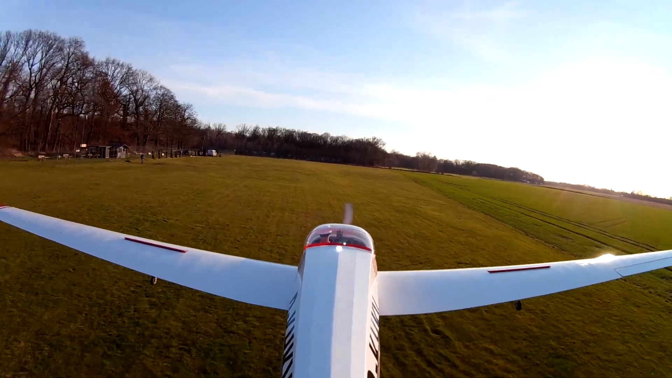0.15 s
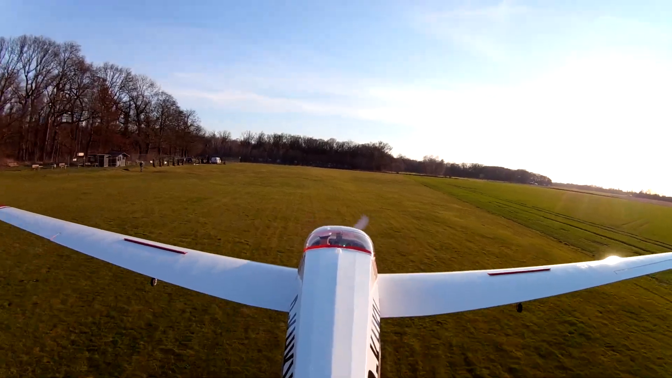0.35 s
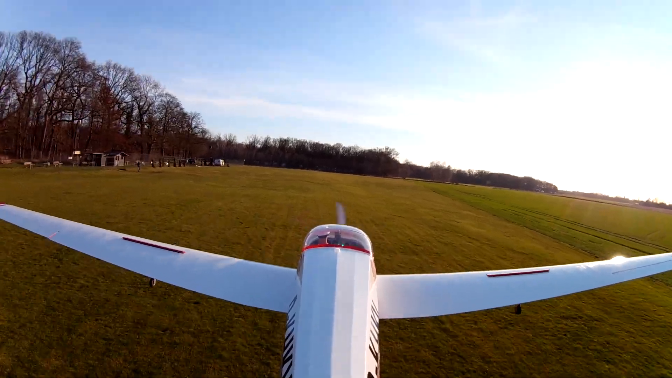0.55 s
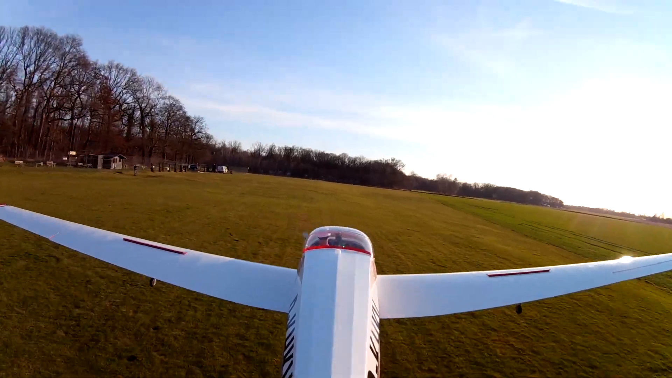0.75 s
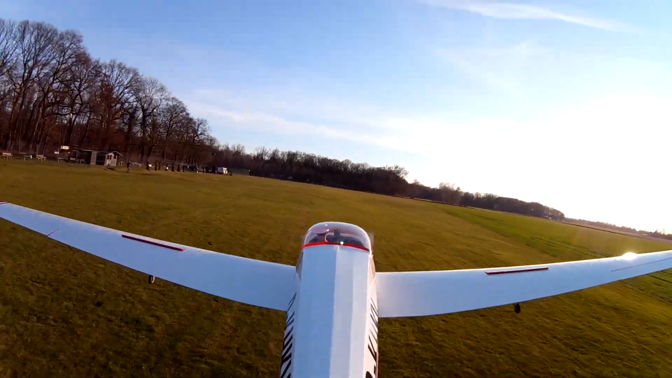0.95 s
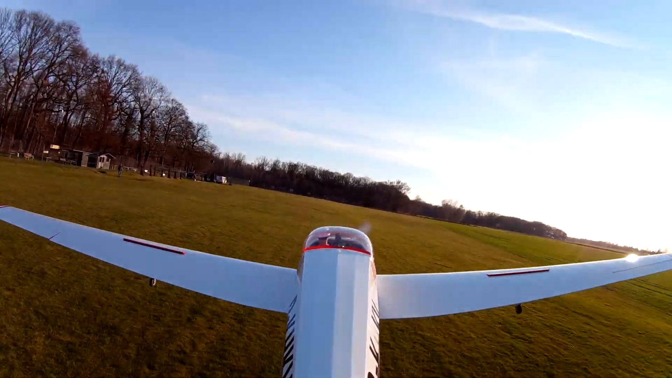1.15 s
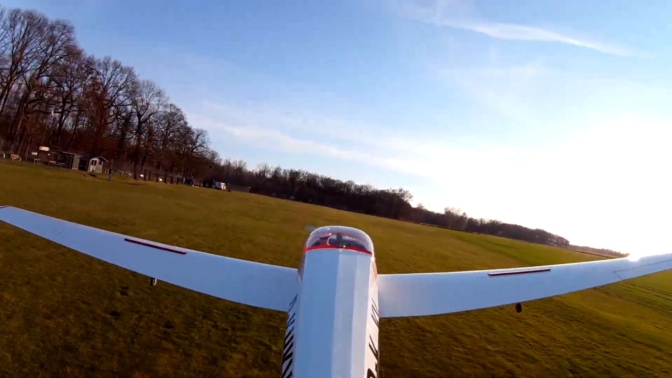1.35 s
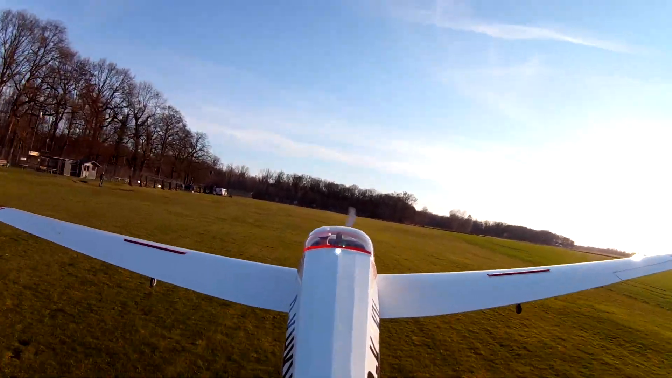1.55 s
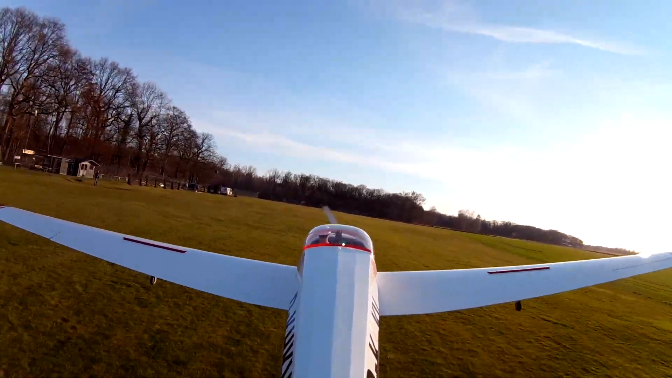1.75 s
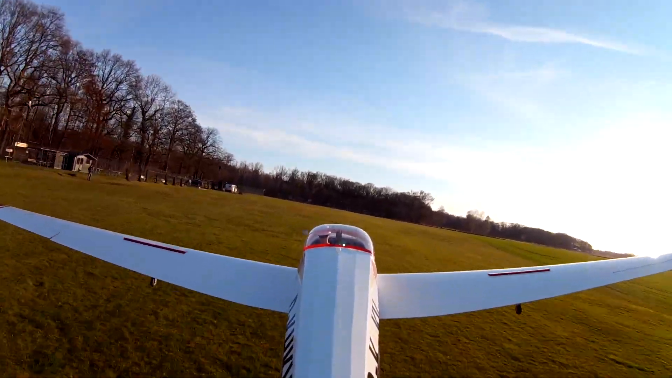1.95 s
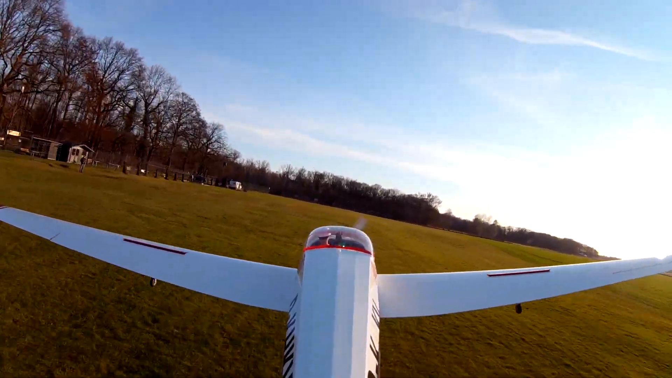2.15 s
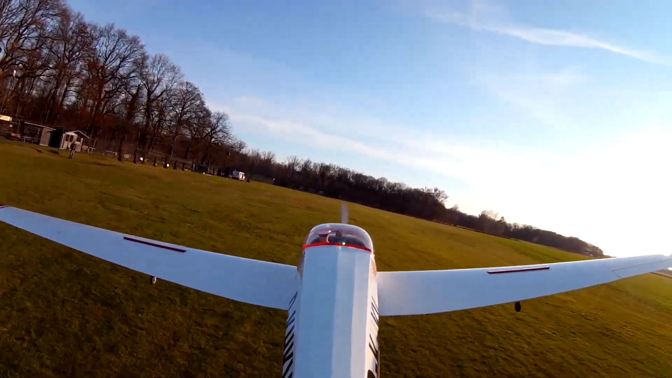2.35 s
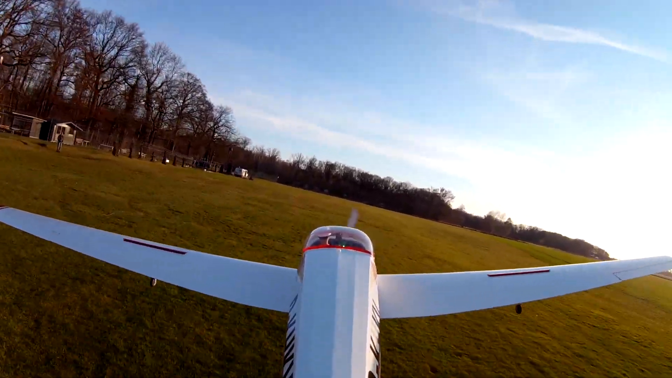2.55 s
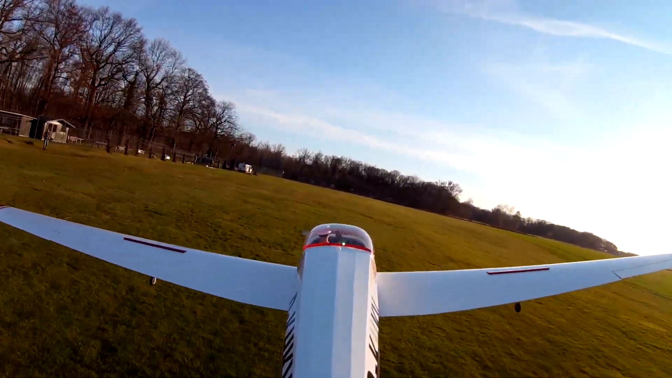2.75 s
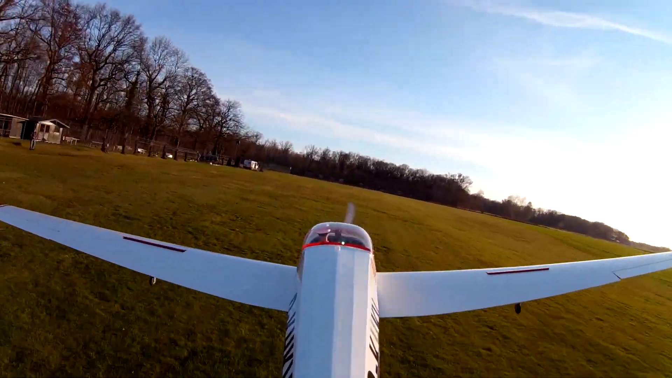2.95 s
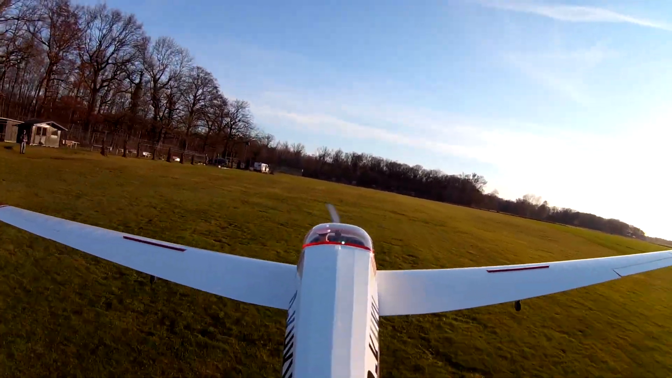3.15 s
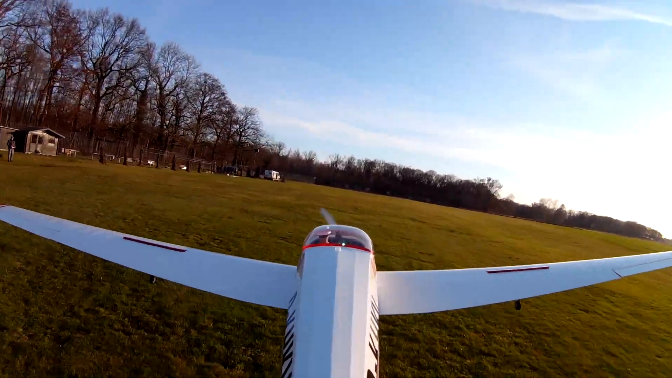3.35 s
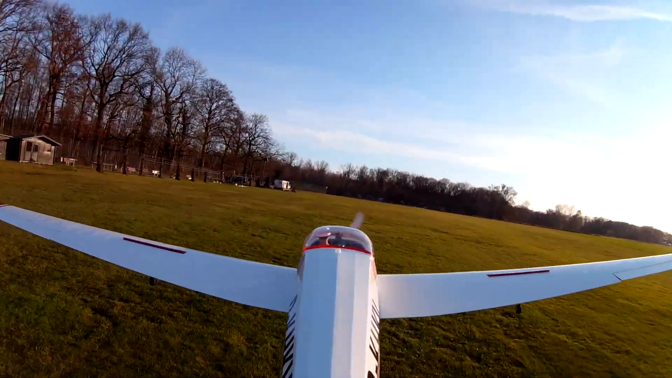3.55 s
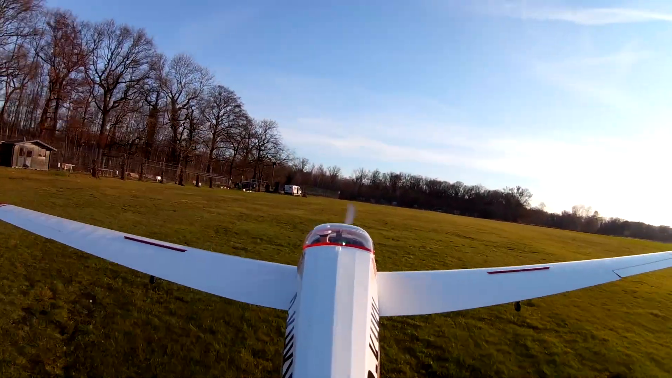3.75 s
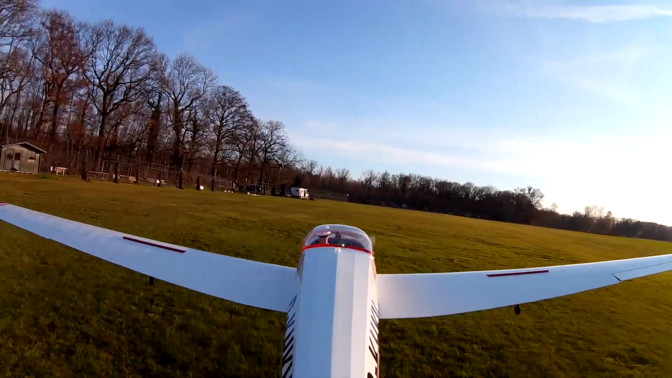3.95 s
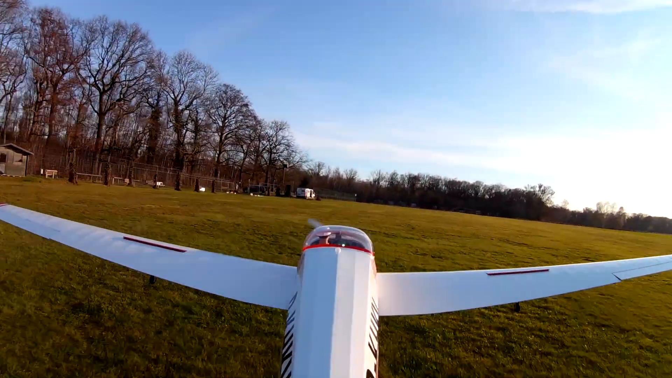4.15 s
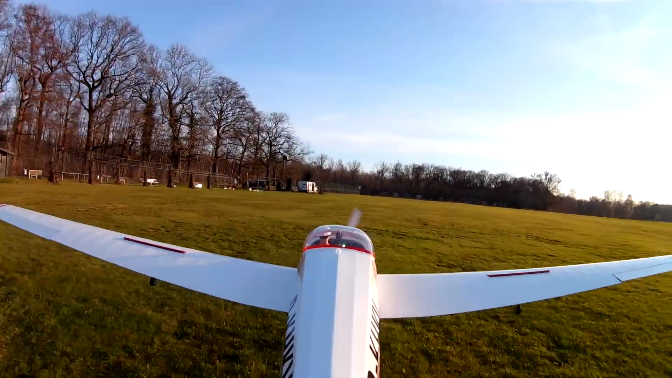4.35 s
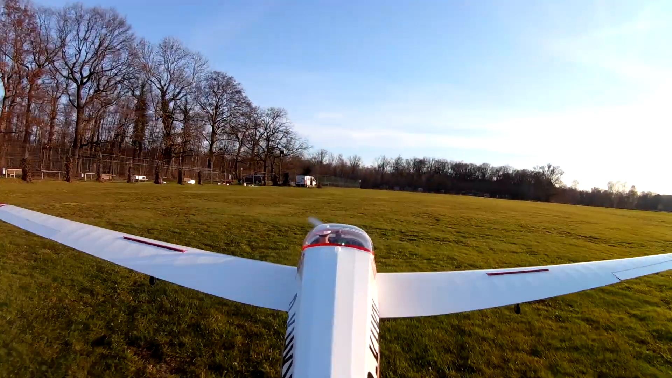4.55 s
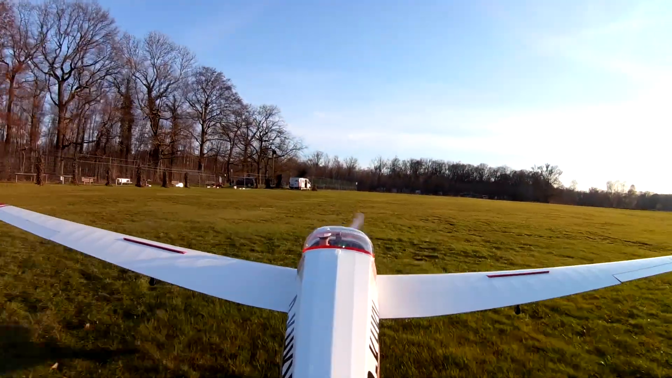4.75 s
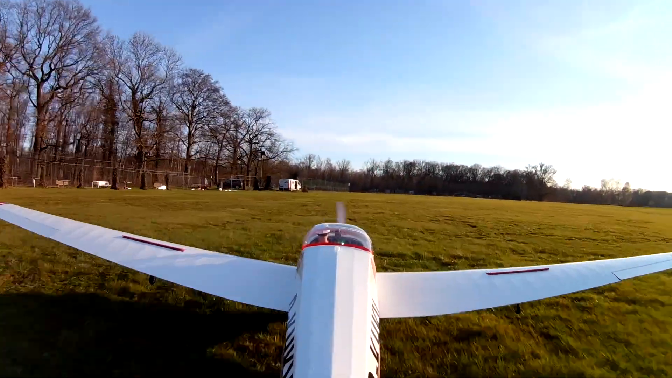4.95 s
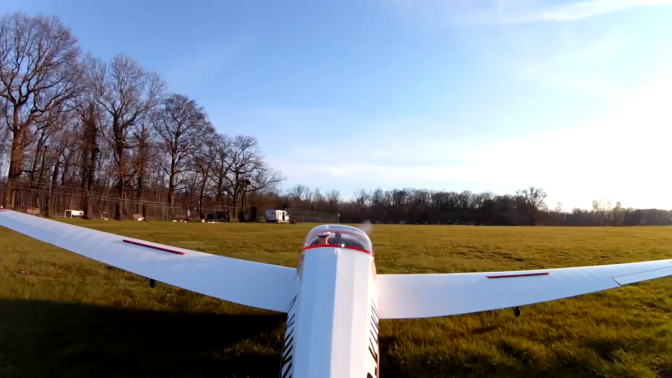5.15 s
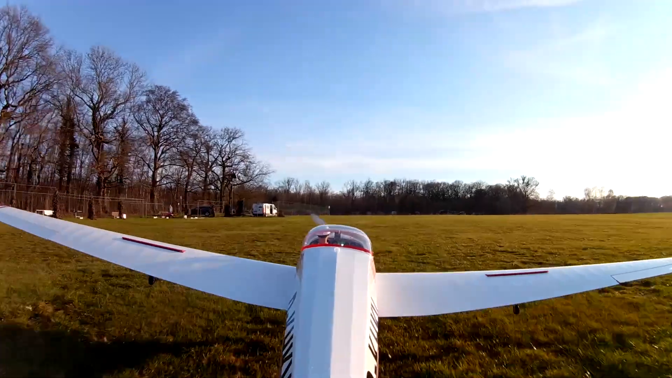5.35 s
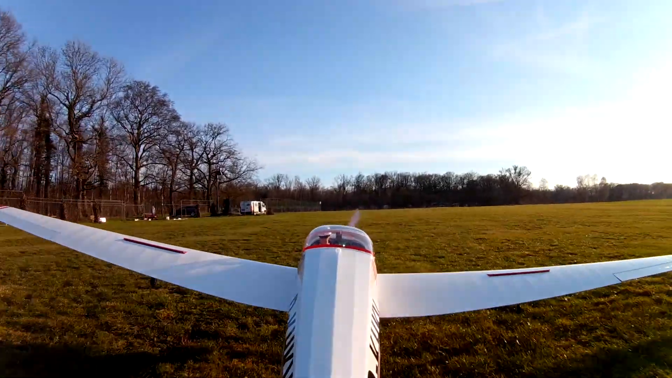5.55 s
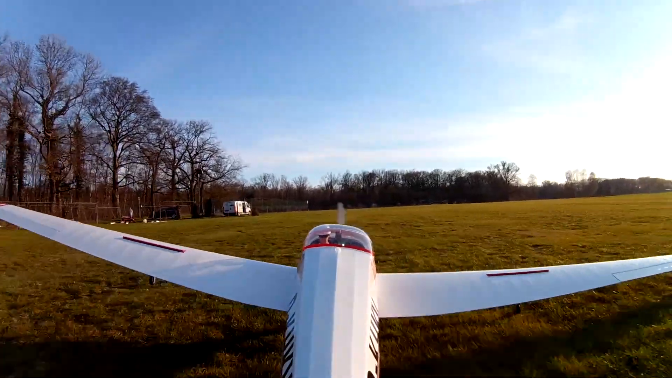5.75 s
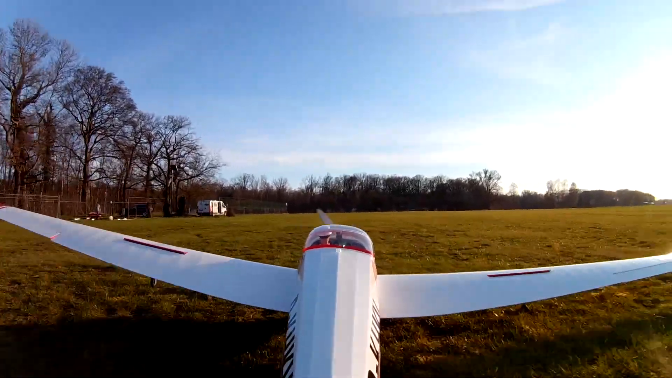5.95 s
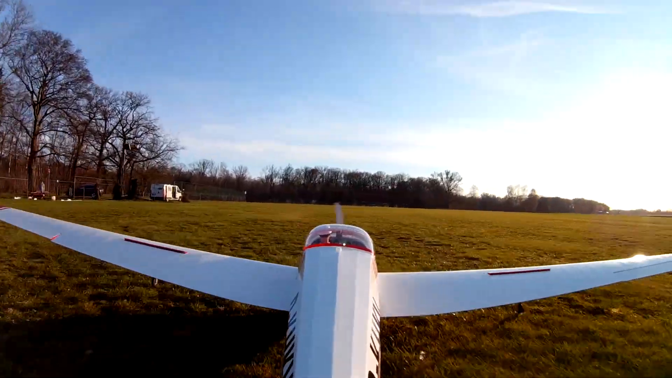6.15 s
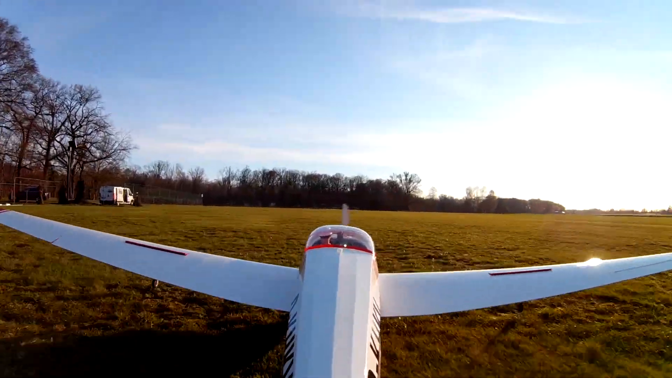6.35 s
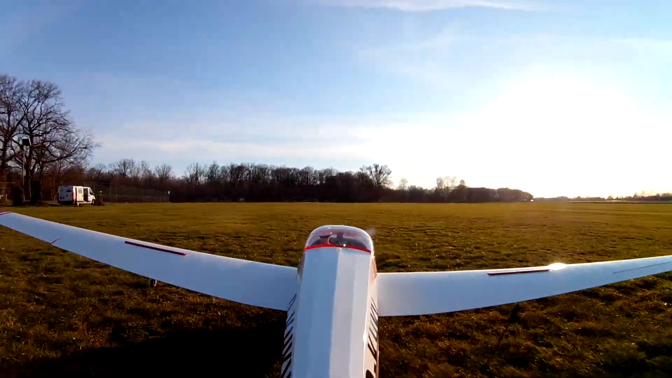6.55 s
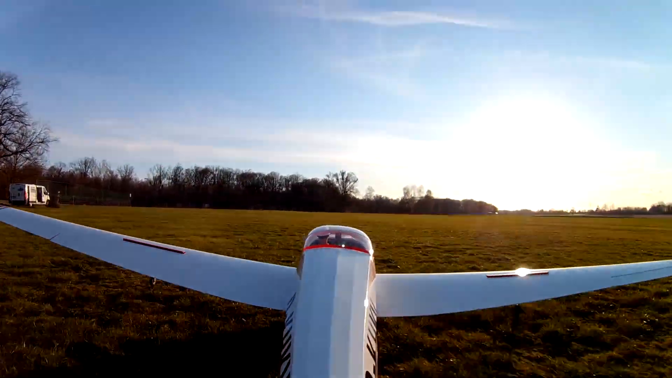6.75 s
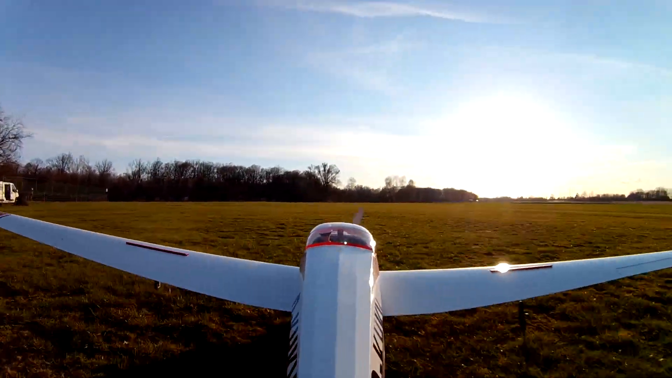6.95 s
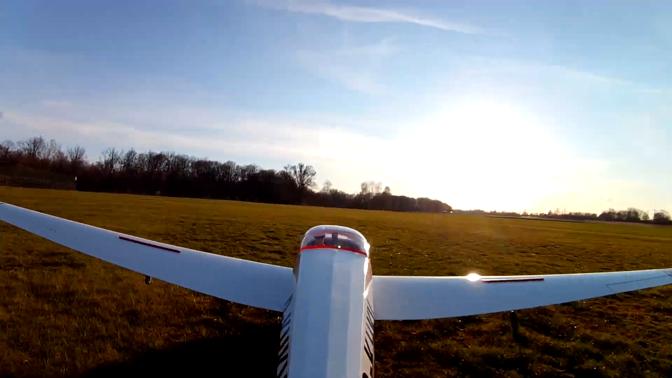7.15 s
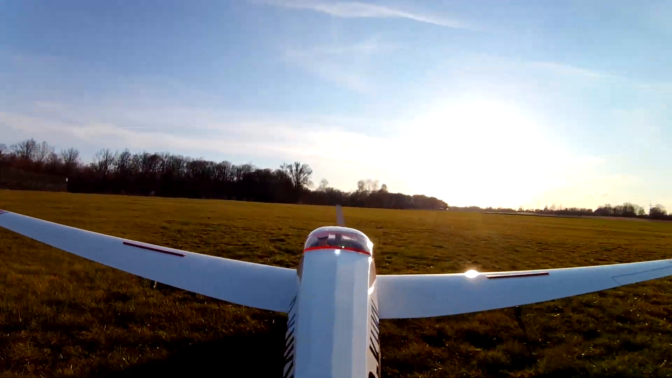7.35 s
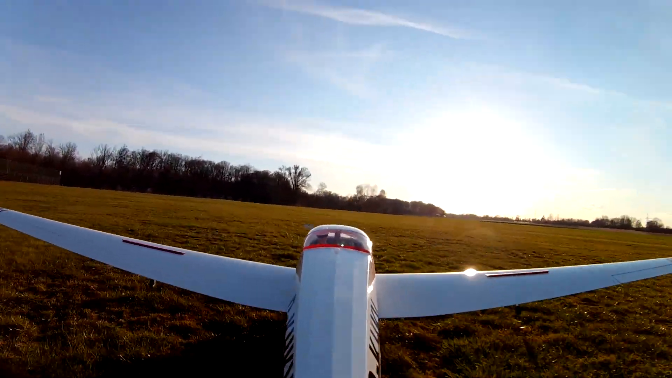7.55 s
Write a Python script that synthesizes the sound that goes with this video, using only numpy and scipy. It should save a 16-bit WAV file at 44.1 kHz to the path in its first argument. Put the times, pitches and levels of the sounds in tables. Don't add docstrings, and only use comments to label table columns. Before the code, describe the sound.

Heard from a small camera in a plastic case on a model aircraft's tail: rushing air and an idling engine's fast, dry rattle, swelling twice. The knocks sag and thin before touchdown at about five seconds. After a brief quieter gap, irregular grass bumps clack and clatter against the case, the hardest ones distorting, over a soft grassy murmur in an open field.

```python
import sys
import numpy as np
from scipy import signal
from scipy.io import wavfile
from scipy.ndimage import uniform_filter1d

SR = 44100
rng = np.random.default_rng(int(sys.argv[2]) if len(sys.argv) > 2 else 0)


def wrap_up_sound(samples):
    columns = np.atleast_2d(samples).T
    tamed = np.clip(columns, -1, 1)
    steps = np.round(tamed * 32767).astype(np.int16)
    wavfile.write(sys.argv[1], SR, steps)


def magnitude_from_level(level_db):
    exponent = np.asarray(level_db, float) / 20
    return 10 ** exponent


N = 339522


def rms_one(x):
    return x / np.sqrt(np.mean(x ** 2) + 1e-20)


def drift(rate):
    pole = np.exp(-40 * np.pi * rate / SR)
    noise = rng.standard_normal(N // 20 + 2002)
    slow = signal.lfilter([1], [1, -2 * pole, pole * pole], noise)[2000:]
    return np.interp(np.arange(N) / 20, np.arange(len(slow)), rms_one(slow))


def air_noise(spectrum, patchy_db, gust_db):
    gust = drift(9.0)
    edges = 30 * 2 ** np.arange(0, 9.3, 1 / 3)
    white = rng.standard_normal((2, N))
    hz, density_db = np.transpose(spectrum)
    out = 0
    for k, (low, high) in enumerate(zip(edges, edges[1:])):
        band_filter = signal.butter(2, [low, high], "band", fs=SR, output="sos")
        band = signal.sosfilt(band_filter, white[k % 2])
        level_db = np.interp(np.log(low * high) / 2, np.log(hz), density_db)
        out = out + magnitude_from_level(level_db + gust_db * gust + patchy_db * drift(15.0)) * band
    return rms_one(out)


def rushing_air(rush_level, hiss_level):
    # frequency in Hz, level in dB per Hz.
    rush_spectrum = [(24, -76), (40, -40.5), (258, -19), (384, -16.5), (585, -7), (763, -6), (1270, -1.5),
                     (1890, -5), (2300, -10.5), (3220, -12.5), (4100, -24.5), (8000, -96), (10400, -81),
                     (17600, -120)]
    # frequency in Hz, level in dB per Hz.
    hiss_spectrum = [(530, -34), (900, -7.5), (1920, 9), (4250, 2), (6970, -14), (7960, -32), (8870, -20.5),
                     (11000, -27.5), (14700, -47), (16000, -65)]
    rush = rush_level * magnitude_from_level(0.5) * air_noise(rush_spectrum, patchy_db=2.0, gust_db=0.64)
    hiss = hiss_level * magnitude_from_level(5.5) * air_noise(hiss_spectrum, patchy_db=1.3, gust_db=1.2)
    top = signal.sosfilt(signal.butter(2, 8500, "high", fs=SR, output="sos"), hiss)
    return rush + hiss + top * hiss_level * magnitude_from_level(55.0)


def turns():
    # time in seconds, rate in turns per second.
    engine = [(0.0, 36.36), (0.45, 37.82), (0.75, 41.31), (1.05, 42.95), (1.35, 41.2), (1.7, 37.61),
              (2.0, 36.5), (2.5, 37.37), (3.1, 39.59), (3.5, 39.51), (3.95, 36.49), (4.2, 33.15),
              (4.6, 30.55), (4.9, 31.78), (5.2, 33.75), (5.6, 32.81), (7.7, 33.0)]
    s, per_s = np.transpose(engine)
    first_turn = 2.95
    return np.cumsum(np.interp(np.arange(N) / SR, s, per_s)) / SR - first_turn


def hum():
    # multiple of the turn rate, level in dB.
    orders = [(1, -92), (2, -93), (3, -90), (4, -92), (5, -90)]
    # frequency in Hz, gain in dB.
    fuselage = [(31, -12), (42, 3), (62, 4), (78, -4), (97, -10), (122, 6), (145, -8), (212, 5)]
    turn = turns()
    per_s = np.gradient(turn) * SR
    hz, gain_db = np.transpose(fuselage)
    out = 0
    for order, level_db in orders:
        order = round(order)
        response_db = np.interp(np.log(order * per_s), np.log(hz), gain_db)
        out = out + magnitude_from_level(level_db + response_db + 1.5 * drift(1.8)) * np.sin(2 * np.pi * order * turn)
    return out


def replaced(events, rows):
    out = events.copy()
    out[np.abs(events[:, :1] - np.array(rows)[:, 0]).argmin(axis=0)] = rows
    return out


def shakes():
    # time in seconds, forward knock in dB,
    # backward knock in dB, high modes over low in dB.
    shaking = [(0, -49, -47, -1), (0.3, -37, -45, -2.5), (0.55, -31, -42.5, -4), (0.749, -31.5, -39, -0.5),
               (0.92, -29, -43.5, -4), (1.05, -31, -37.5, -2.5), (1.45, -30.5, -42, -1),
               (1.7, -34, -44, -3.5), (2.0, -45, -67, -7), (2.35, -37, -52, -7), (2.7, -33.5, -46, -2.5),
               (3.0, -30.5, -39.5, -3), (3.5, -32, -44, -4), (3.95, -35.5, -58, -8.5),
               (4.03, -52, -53, -11), (4.2, -43, -39, -6), (4.5, -59, -48.5, -8), (5.2, -48, -59, -7)]
    # time in seconds, low modes in dB, high modes in dB.
    hard_turns = [(0.0807, -37, -33), (0.1904, -37, -38), (0.2982, -30, -29), (0.403, -27.5, -27.5),
                  (0.5082, -28, -28.5), (0.5856, -26.5, -29.5), (0.6605, -24.5, -29), (0.7352, -27, -33.5),
                  (0.8793, -26, -30.5), (0.95, -25.5, -31), (1.0204, -26.5, -28.5), (1.0442, -27.5, -33.5),
                  (1.0679, -30, -28.5), (1.1151, -26, -37), (1.138, -26.5, -30.5), (1.2091, -26, -30),
                  (1.233, -29, -29), (1.2803, -25.5, -29.5), (1.3286, -26.5, -30), (1.3543, -26, -35),
                  (1.3776, -28.5, -28), (1.5017, -24, -29.5), (1.552, -29, -34), (1.6553, -30.5, -33.5),
                  (1.7614, -29, -35.5), (1.87, -32, -38.5), (1.9797, -30.5, -36), (2.0876, -31, -36),
                  (2.1975, -32, -34.5), (2.2774, -34, -43),
                  (2.305, -34, -37.5), (2.4651, -31.5, -37.5), (2.5196, -30, -31.5),
                        (2.599, -28, -31.5), (2.6784, -29, -30), (2.757, -26.5, -27.5),
                        (2.8356, -28.5, -30.5), (2.887, -26, -29), (2.964, -27, -28.5), (3.0406, -25, -28),
                        (3.1169, -26.5, -31.5), (3.1668, -26, -29.5), (3.2426, -28, -30.5),
                        (3.2933, -28.5, -31.5), (3.3178, -25.5, -29), (3.394, -27, -29.5),
                        (3.4689, -27, -31.5), (3.546, -29, -32.5), (3.572, -29.5, -31.5),
                        (3.597, -29.5, -29.5), (3.649, -28, -30), (3.7289, -32, -31.5),
                        (3.7817, -29.5, -29), (3.8091, -30.5, -34), (3.889, -32.5, -40), (3.9714, -33, -44),
                        (4.2002, -35, -42), (4.3553, -39, -48), (4.611, -37.5, -50), (4.6424, -36, -43)]
    # time in seconds, share of a turn.
    back_turn = [(0.3, .43), (1.1, .5), (1.5, .49), (2.6, .45), (3.2, .41), (3.55, .42), (3.8, .47),
                 (4.5, .52), (4.95, .44)]
    # time in seconds, low modes in dB, high modes in dB.
    slow_turns = [(4.141, -40, -48.5), (4.171, -37.5, -48), (4.215, -39, -49), (4.2482, -39, -48),
                  (4.2765, -39, -46), (4.3079, -37.5, -44), (4.369, -37, -46), (4.401, -43, -49),
                  (4.433, -40, -47.5), (4.465, -41, -47), (4.497, -39.5, -48.5), (4.5616, -34, -46),
                  (4.5938, -37, -44.5), (4.6894, -47, -54), (4.7203, -47, -51), (4.7555, -50, -51),
                  (4.8167, -44, -51), (4.9115, -39, -47), (4.9607, -39, -51), (4.974, -49, -49),
                  (4.9928, -36, -46), (5.023, -37, -49), (5.054, -36, -48), (5.085, -38, -47)]
    end_s, jitter_s = 5.62, .00015
    spread_db, back_spread_db = 1.2, 2.0
    t, turn = np.arange(N) / SR, turns()
    count = np.arange(np.ceil(turn[0]), turn[int(end_s * SR)])
    luck = rng.standard_normal((len(count), 6))
    s = np.interp(count, turn, t) + jitter_s * luck[:, 0]
    back_share = np.interp(s, *np.transpose(back_turn))
    back_s = np.interp(count + back_share, turn, t) + 2 * jitter_s * luck[:, 1]

    when, *columns = np.transpose(shaking)
    plain_db, back_db, bright_db = [np.interp(s, when, c) for c in columns]
    low_db = plain_db + spread_db * luck[:, 2]
    high_db = plain_db + bright_db + spread_db * luck[:, 3]
    lull = s > when[-1]
    low_db[lull] = -66
    high_db[lull] = -58.5 + spread_db * luck[lull, 3]
    forward = replaced(np.c_[s, low_db, high_db], hard_turns)

    excess_db = np.maximum(forward[:, 2] - plain_db - bright_db, 0)
    back_db = back_db + .6 * excess_db - 20 * lull
    back_low_db = back_db + back_spread_db * luck[:, 4]
    back_high_db = back_db + 7 + 2.43 * bright_db + spread_db * luck[:, 5]
    backward = np.c_[back_s, back_low_db, back_high_db]
    return replaced(np.r_[forward, backward], slow_turns)


def loose_ticks(level):
    per_s, tick_db = 82, -15
    born = rng.random(N) < per_s / SR
    return level * born * magnitude_from_level(tick_db + 4.7 * np.minimum(rng.exponential(1, N), 4))


def resonance(x, hz, width_hz):
    r, w = np.exp(-np.pi * width_hz / SR), 2 * np.pi * hz / SR
    return signal.lfilter([0, np.sin(w)], [1, -2 * r * np.cos(w), r * r], x + 1e-18)


def knocks(events, rebound_db, loose):
    # frequency in Hz, width in Hz, level in dB.
    case_low = [(687, 295, -11), (1356, 233, -5), (2065, 176, -5), (2443, 257, -0.5)]
    # frequency in Hz, width in Hz, level in dB.
    case_high = [(3205, 800, -2), (4206, 370, -2), (6040, 850, -10.5), (7180, 550, -17), (8980, 780, -20),
                 (11420, 1030, -12)]
    rebound_s, chatter_s, chatter_db = .0026, 0.002, -14.5
    s, low_db, high_db = np.transpose(events)
    luck = rng.standard_normal((len(s), 34))
    at = np.minimum(np.round(s * SR).astype(int), N - 1)
    flight = np.round(SR * rebound_s * magnitude_from_level(.7 * luck[:, 0])).astype(int)
    first_back = np.minimum(at + flight, N - 1)
    second_back = np.minimum(at + 2 * flight, N - 1)
    force_db = np.maximum(low_db, high_db) + 28
    rebound = magnitude_from_level(np.minimum(rebound_db + 0.6 * force_db + luck[:, 1], 0))

    marks = np.zeros(N)
    np.add.at(marks, at, magnitude_from_level(high_db + chatter_db))
    chatter_level = signal.lfilter([1], [1, -np.exp(-1 / (chatter_s * SR))], marks)
    chatter = chatter_level * rng.standard_normal(N)

    out = np.zeros(N)
    for k, (hz, width_hz, level_db) in enumerate(case_low + case_high):
        high = k >= len(case_low)
        mode_db = high_db - 1.0 if high else low_db
        size = magnitude_from_level(mode_db + 0.28 * force_db * (k < 2))
        clicks = chatter + loose if high else chatter * magnitude_from_level(-2.5)
        np.add.at(clicks, at, size * magnitude_from_level(.5 * luck[:, 2 + k]))
        back = size * rebound * magnitude_from_level(4.0 if high else -6.0)
        np.add.at(clicks, first_back, back * magnitude_from_level(2 * luck[:, 12 + k]))
        np.add.at(clicks, second_back, back * rebound * magnitude_from_level(-2.5 + 2 * luck[:, 22 + k]))
        out += (-1) ** k * magnitude_from_level(level_db) * resonance(clicks, hz, width_hz)
    return out


def bumps():
    # time in seconds, low modes in dB, high
    # modes in dB.
    grass_bumps = [(5.1137, -29.5, -32), (5.128, -31, -46), (5.1457, -34.5, -37), (5.1616, -39, -38.5),
                   (5.2373, -28.5, -36), (5.2534, -31.5, -42), (5.2641, -30, -26), (5.276, -24, -27.5),
                   (5.2888, -44.5, -41), (5.4425, -43, -52), (5.9257, -56, -49), (5.9975, -38, -46.5),
                   (6.0318, -34, -44), (6.0475, -28.5, -35), (6.0669, -31, -31), (6.0814, -33, -43),
                   (6.1037, -24, -26), (6.1197, -49, -57), (6.1294, -33, -38.5), (6.1535, -34.5, -46),
                   (6.192, -36, -55), (6.358, -28, -33), (6.3928, -21, -24), (6.4043, -32, -25.5),
                   (6.413, -37, -33), (6.417, -24, -24), (6.4335, -41, -43), (6.5509, -35.5, -62),
                   (6.6727, -34.5, -37.5), (6.7655, -35, -56),
                   (6.8119, -24, -25.5), (6.8183, -26.5, -33), (6.8276, -21.5, -22), (6.8452, -26, -30),
               (6.9184, -34, -43), (6.94, -30, -35), (6.958, -23.5, -38), (6.9601, -26, -27.5),
               (6.9769, -33, -42), (7.0814, -32, -42.5), (7.1678, -35.5, -45), (7.195, -34, -39),
               (7.2002, -34, -35), (7.216, -31, -37), (7.2285, -22.5, -25.5), (7.2445, -28, -26),
               (7.2568, -33, -31.5), (7.2619, -28, -33.5), (7.3048, -40, -50), (7.3864, -27.5, -31),
               (7.3948, -28.5, -33.5), (7.4435, -26.5, -31), (7.461, -29.5, -40), (7.477, -31, -43),
               (7.4938, -38, -41.5), (7.5525, -39, -44), (7.5789, -37, -46), (7.6517, -34, -42),
               (7.6639, -25, -26.5), (7.685, -25.5, -30.5)]
    rows = np.array(grass_bumps)
    luck = rng.standard_normal((len(rows), 3))
    delay_s = 0.0099 * magnitude_from_level(2.0 * luck[:, 0])
    trail = rows + np.c_[delay_s, -22 + 3.0 * luck[:, 1], -10.5 + 2.5 * luck[:, 2]]
    roll_s, stray_per_s, stray_db = 5.9, 9, -45.5
    rolling = np.arange(N) > roll_s * SR
    s = np.flatnonzero((rng.random(N) < stray_per_s / SR) & rolling) / SR
    stray = np.c_[s, np.full(len(s), stray_db), np.full(len(s), stray_db - 4.0)]
    return np.r_[rows, trail, stray]


def swish(events):
    decay_s, murmur_db = 0.036, -13
    marks = np.zeros(N)
    at = np.minimum(events[:, 0] * SR, N - 1).astype(int)
    np.add.at(marks, at, magnitude_from_level(events[:, 1] + murmur_db - 13.5))
    return signal.lfilter([1], [1, -np.exp(-1 / (decay_s * SR))], marks)


def scene():
    # time in seconds, dull rush through the case in dB, bright hiss in dB.
    air = [(0, -47, -45.5), (0.2, -46, -47), (0.37, -47, -49.5), (0.48, -50.5, -60), (1.0, -50, -61.5),
           (1.45, -48, -53.5), (2.1, -51.5, -59), (2.9, -49.5, -58), (3.8, -54.5, -75), (4.2, -54.5, -71),
           (5.2, -56, -76.5), (5.45, -58, -92), (5.93, -56, -94), (6.2, -53.5, -63), (6.6, -48.5, -67.5),
           (7.0, -50, -82), (7.12, -52, -86), (7.7, -55.5, -75)]
    s, rush_db, hiss_db = np.transpose(air)
    t = np.arange(N) / SR
    blows = bumps()
    rush_level = np.hypot(magnitude_from_level(np.interp(t, s, rush_db)), swish(blows))
    hiss_level = magnitude_from_level(np.interp(t, s, hiss_db))
    flow = rushing_air(rush_level, hiss_level)
    shaken = knocks(shakes(), rebound_db=-3, loose=loose_ticks(rush_level))
    bumped = knocks(blows, rebound_db=-3.5, loose=0)
    return (flow + shaken + bumped + hum())[None]


def microphone_port(x):
    # frequency in Hz, width in Hz, share removed.
    notches = [(7950, 650, .88), (13450, 600, .7)]
    x = signal.sosfilt(signal.butter(3, 12200, fs=SR, output="sos"), x)
    for hz, width_hz, share in notches:
        r, w = np.exp(-np.pi * width_hz / SR), 2 * np.pi * hz / SR
        zeros = np.array([1, 0, -1]) * (1 - r * r) / 2
        x = x - share * signal.lfilter(zeros, [1, -2 * r * np.cos(w), r * r], x)
    return x


def overload(x):
    limit = .048
    held = np.clip(x, -limit, limit)
    thump = signal.sosfilt(signal.butter(2, 300, fs=SR, output="sos"), np.abs(x - held))
    return np.clip(x - magnitude_from_level(-7.0) * thump, -limit, limit)


def top_gate(x):
    edges_hz = [12050, 13250, 17000]
    gate_db, gate_s = -92, .012
    out = x
    for low, high in zip(edges_hz, edges_hz[1:]):
        band = signal.sosfiltfilt(signal.butter(6, [low, high], "band", fs=SR, output="sos"), x)
        level_db = 10 * np.log10(uniform_filter1d(band ** 2, int(gate_s * SR)) + 1e-20)
        shut = uniform_filter1d(np.clip((gate_db - level_db) / 2, 0, 1), size=128)
        out = out - .85 * shut * band
    return out


def roll_off(x):
    return signal.sosfilt(signal.butter(12, 16360, fs=SR, output="sos"), x)


def record(dry):
    x = overload(microphone_port(dry))
    x = signal.sosfilt(signal.butter(14, 15200, fs=SR, output="sos"), x)
    mix = top_gate(x)
    return roll_off(mix)


dry = scene()
out = record(dry)
wrap_up_sound(out)
```